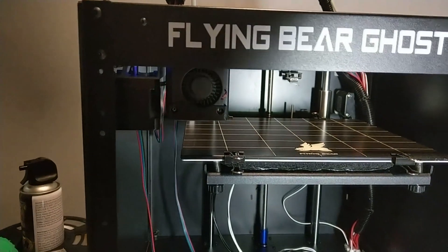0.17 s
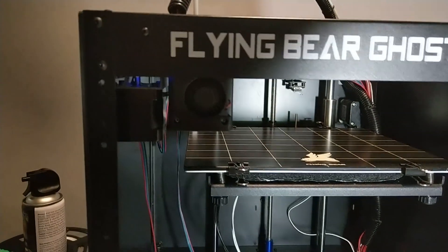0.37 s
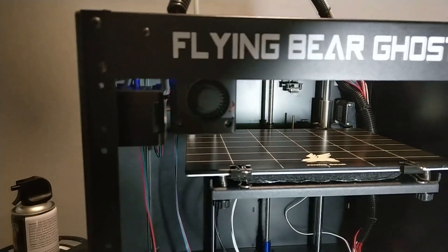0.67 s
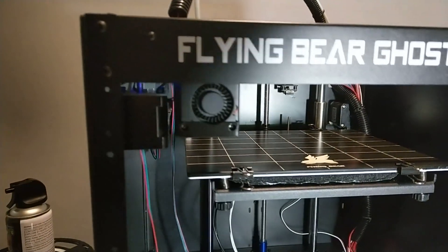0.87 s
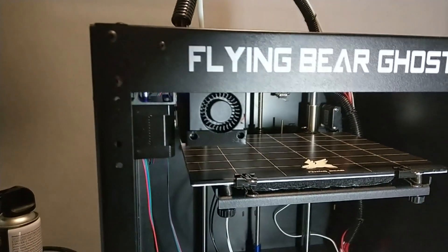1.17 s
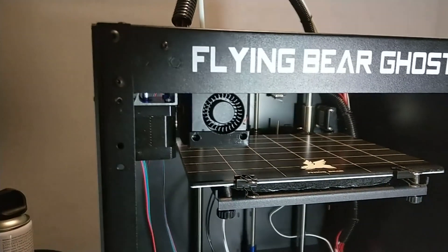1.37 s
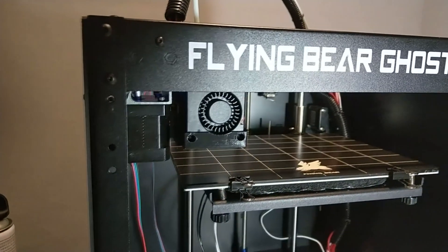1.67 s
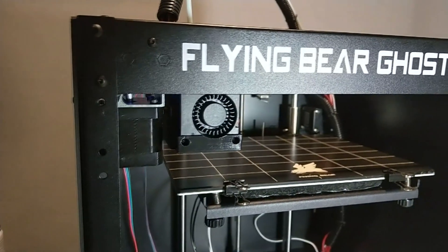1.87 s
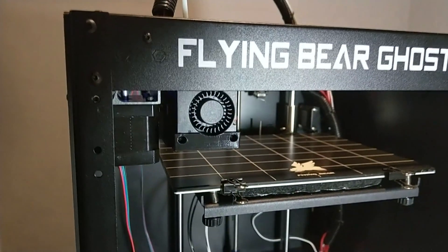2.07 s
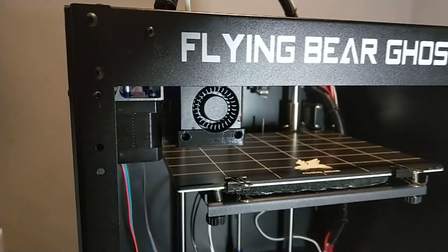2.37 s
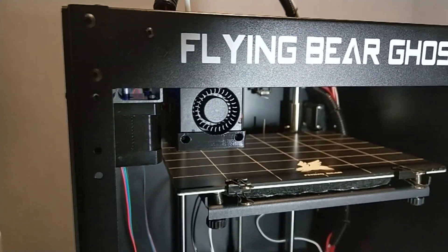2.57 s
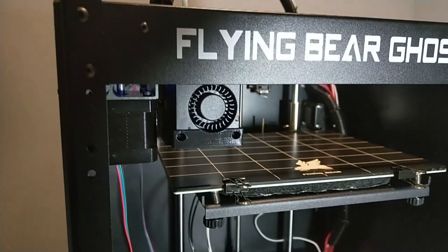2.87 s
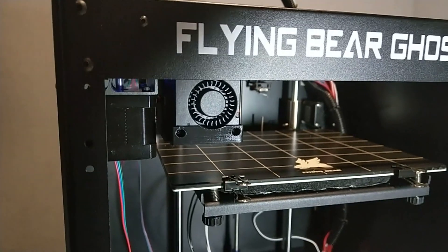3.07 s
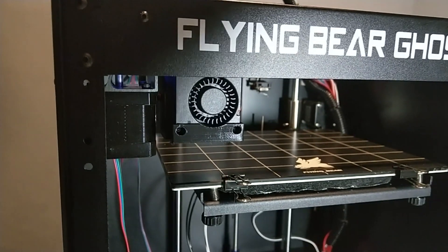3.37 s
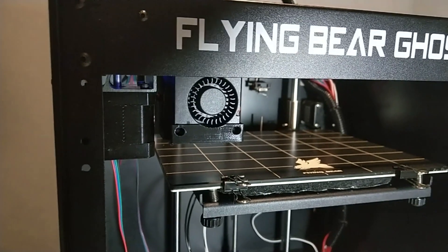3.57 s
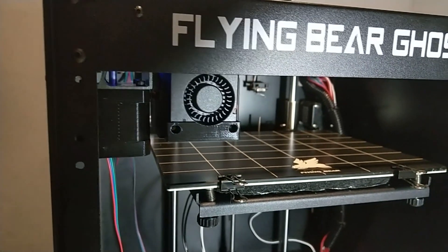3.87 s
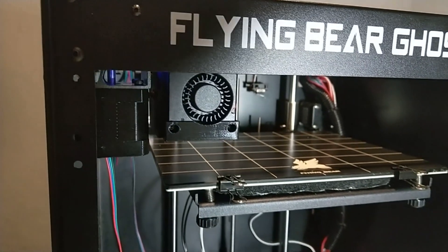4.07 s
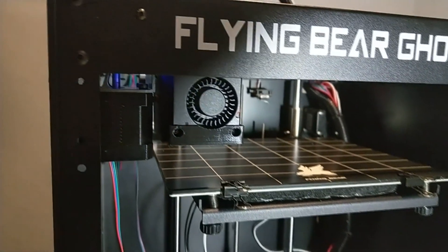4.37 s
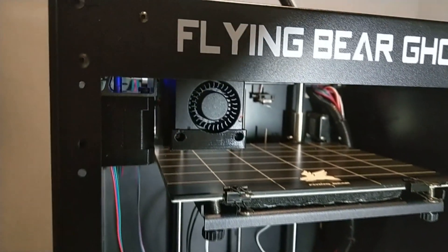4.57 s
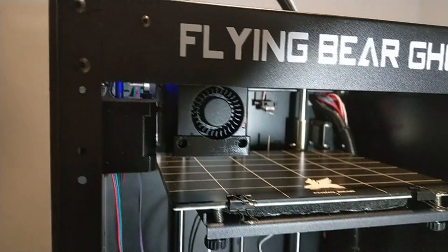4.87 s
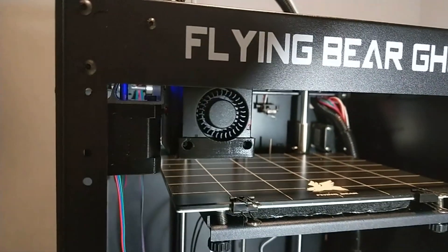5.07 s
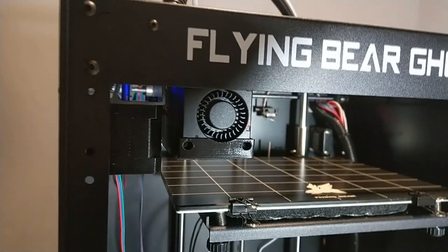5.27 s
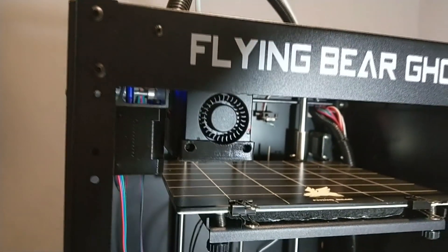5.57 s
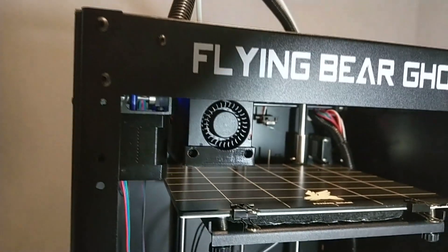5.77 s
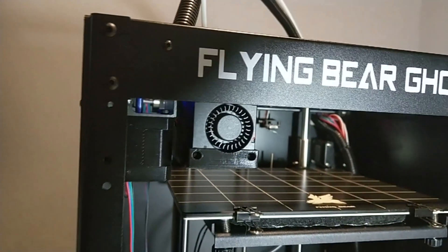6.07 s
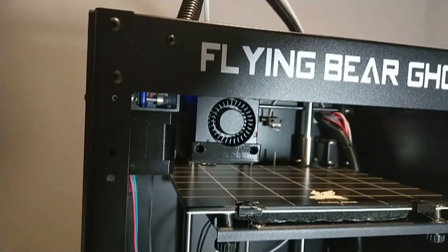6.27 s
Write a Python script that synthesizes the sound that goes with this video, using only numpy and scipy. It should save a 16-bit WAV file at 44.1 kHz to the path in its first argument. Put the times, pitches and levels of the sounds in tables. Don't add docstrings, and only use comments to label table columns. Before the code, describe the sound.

A small cooling fan with a dry, worn bearing runs close by in a quiet workshop, brighter toward the right. From 0 to about 0.4 seconds a piercing metallic whine, strongest around 7 kHz, flutters widely about 25 times a second over a low buzz near 157 Hz. It then calms to a steadier, slightly trembling whine, easing a little around 0.7. At about 1.1 its timbre shifts with a brief rough slip, and from 1.4 its pitch sags slightly. Around 2.4 the whine abruptly disappears; the rotor speeds up into a dense, bright, hissing rattle with ringing housing and wavering low tones. It is roughest near 3.5, then from 3.7 settles into a steady rattling whir with cleaner low hum until 6.3. Faint room hush, mains hum and handling rumble persist, with dull bumps near 0.2, 2.3, 3.1, 3.7 and 4.2.

```python
import sys
import numpy as np
from scipy import signal
from scipy.fft import rfft, irfft, next_fast_len
from scipy.io import wavfile
from scipy.ndimage import uniform_filter1d

SR = 44100
rng = np.random.default_rng(int(sys.argv[2]) if len(sys.argv) > 2 else 0)


def voltage_ratio(level):
    return 10 ** (np.asarray(level, float) / 20)


def master_out(mix):
    frames = np.transpose(np.atleast_2d(mix))
    ceiling = np.clip(frames, -1, 1)
    pcm = np.round(ceiling * 32767).astype(np.int16)
    wavfile.write(sys.argv[1], SR, pcm)


N = 282681
SIZE = next_fast_len(N)
TIME = np.arange(N) / SR
HZ = np.fft.rfftfreq(SIZE, 1 / SR)

CALM_S, SHIFT_S, UNLOCK_S, SETTLE_S = .435, 1.09, 2.39, 3.66
LOCKED_TURNS = 159.1

# (frequency [Hz], width [Hz], level [dB])
HOUSING_MODES = [(2318, 20, -13.5), (2850, 20, -17), (3214, 150, -15), (3553, 133, -17), (3970, 170, -16),
                 (4513, 184, -14), (5259, 55, -2.5), (5420, 32, -8), (5760, 220, -8), (5900, 28, -8.5),
                 (6310, 130, -5), (6924, 330, -2.5), (7230, 60, -3), (7430, 79, -2), (7536, 44, -1.5),
                 (7820, 114, -0.5), (8350, 300, -8.5), (8780, 110, -8.5), (9830, 110, -12)]
# (time [s], bearing level [dB], unbalance hum level [dB], frame ring level [dB])
LOOSE_LEVELS = [
    (2.42, -44, -78, -62),
    (2.7, -42.5, -69.5, -56),
    (2.95, -42, -69.5, -55.5),
    (3.07, -43.5, -68.5, -57),
    (3.16, -42.5, -64.5, -56.5),
    (3.54, -41, -67, -51.5),
    (3.72, -43, -65, -61),
    (4.3, -42, -62.5, -56.5),
    (6.3, -43, -62, -57),
]


def level(x, db):
    return x * voltage_ratio(db) / np.sqrt(np.mean(x ** 2))


def curves(table):
    s, *columns = np.transpose(table)
    return [np.interp(TIME, s, c) for c in columns]


def across(table, hz, index=1):
    table = np.array(table)
    return np.interp(np.log(hz + 1), np.log(table[:, 0]), table[:, index])


def modes(table, hz):
    power = sum(voltage_ratio(db) ** 2 / (1 + (2 * (hz - f) / width) ** 2) for f, width, db in table)
    return np.sqrt(power)


def colour(x, gain):
    return irfft(rfft(x, SIZE) * gain, SIZE)[..., :N]


def noise_pair():
    return rng.standard_normal((2, N))


def walk(rate):
    return level(colour(rng.standard_normal(N), 1 / (1 + (HZ / rate) ** 2)), 0)


def after(s, blend_s):
    return np.clip((TIME - s) / blend_s + .5, 0, 1)


def since(s):
    return np.maximum(TIME - s, 0)


def shaft():
    tire_s = 1.4
    tired = np.minimum(since(tire_s), UNLOCK_S - tire_s)
    locked = LOCKED_TURNS - 2.8 * np.exp(-TIME / .6) - .65 * tired ** 2
    free = 12.95 * (1 - np.exp(-since(UNLOCK_S) / .33))
    settled = 4.8 * (1 - np.exp(-since(SETTLE_S) / .7))
    return locked + free + settled


def wobble():
    wide_hz, calm_hz = 25, 29.4
    wide_swing, calm_swing, shifted_swing, tired_swing = .069, .019, .028, .016
    calm = after(CALM_S, .08)
    hz = wide_hz + calm * (calm_hz - wide_hz + 1.5 * walk(4))
    hz = hz - 11 * since(1.7)
    small = calm_swing + (shifted_swing - calm_swing) * after(SHIFT_S, .1)
    small = small + (tired_swing - shifted_swing) * after(1.95, .15)
    swing = wide_swing + calm * (small * voltage_ratio(2.0 * walk(4)) - wide_swing)
    return swing * np.cos(2 * np.pi * (-.75 + np.cumsum(hz) / SR))


def knock_lines():
    # (multiple of turn rate, level while the wobble is wide [dB],
    # level once calm [dB], level after the contact shifts [dB])
    favoured = [(2, -31, -39, -40), (3, -23, -20, -21), (5, -33, -26, -25), (12, -23, -29, -27),
                (13, -15, -15, -18), (15, -22, -21, -30), (20, -23, -19, -24), (24, -27, -22, -28),
                (27, -19, -18, -22), (31, -15, -12.5, -17.5), (32, -24, -23, -21), (33, -20, -10, -15),
                (35, -21, -16, -16), (36, -23, -24, -16), (37, -16, -20, -8.5), (41, -15, -12, -11),
                (42, -15, -19, -12), (43, -14, -15, -3), (44, -4, -6, -13), (45, 5, 4.5, 0),
                (46, -13, -9, -10), (47, -9, -9, .5), (48, -13, -15, -24), (49, -2, 1.5, -2),
                (50, -7, -8.5, -12), (51, -14, -17, -10), (52, -17, -14, -20), (55, -21, -18, -14),
                (57, -24, -22, -32), (61, -21, -24, -27)]
    # (frequency [Hz], level [dB])
    plain_levels = [(600, -34), (1400, -31.5), (2700, -33), (3400, -25), (4700, -26.5), (5300, -23),
                    (6700, -12.5), (9600, -25.5), (10700, -40.5)]
    k = np.arange(2, 79)
    plain = across(plain_levels, k * LOCKED_TURNS)
    plain = plain - 4 * (k % 2 == 0)
    scatter_db = 1.5 * rng.standard_normal((len(k), 3))
    rows = np.column_stack([k, plain[:, None] + scatter_db])
    favoured_rows = np.round(favoured)[:, 0].astype(int) - 2
    rows[favoured_rows, 1:] = np.array(favoured)[:, 1:]
    return rows


def knocks(angle, turn_hz):
    loudest_line = 45
    count = int((UNLOCK_S + 0.018) * SR)
    sway = wobble() + .004 * walk(40)
    swung_angle = (angle + sway)[:count]
    swung_hz = (turn_hz + np.gradient(sway) * SR / (2 * np.pi))[:count]
    drag_db = -0.15 * np.clip(swung_hz - turn_hz[:count], -1, 1)
    grid_hz = np.arange(0, 14000, 5)
    notch = 1.08 - modes([(7195, 150, 0)], grid_hz) ** 2
    body = (.1 + modes(HOUSING_MODES, grid_hz)) ** .6 * notch
    calm = after(CALM_S, .03)[:count]
    creep, jump = after(SHIFT_S - .03, 0.68)[:count], after(SHIFT_S, 0.14)[:count]
    sag_db = -7 * after(.62 + 0.064, .2)[:count] * (1 - jump)
    drift_db = 1.0 * walk(1.5) + 1.1 * walk(35)
    out, chance = np.zeros((2, N)), rng.uniform(0, 1, (90, 3))
    for k, wide_db, early_db, late_db in knock_lines():
        slide = np.interp(k * swung_hz, grid_hz, body)
        slide = slide / np.sqrt(uniform_filter1d(slide ** 2, size=4000))
        shifted = jump if 44 < k < 49 else creep
        db = wide_db + (early_db - wide_db) * calm + (late_db - early_db) * shifted
        if k == loudest_line:
            db = db + sag_db
        phase_chance, _, drift_chance = chance[int(k)]
        own = int(drift_chance * (N - count))
        strength = voltage_ratio(db + min(k / 30, 1) * (drift_db[own:own + count] + drag_db)) * slide
        phase = 2 * np.pi * (phase_chance + np.array([[0], [.25]]))
        out[:, :count] += strength * np.sin(k * swung_angle + phase)
    power = uniform_filter1d(out[0] ** 2, size=12000)
    return out / np.sqrt(power + 1e-6 + (TIME > UNLOCK_S + .03))


def rattle(angle):
    # (frequency [Hz], level [dB])
    floor = [(600, -32.5), (1100, -29.5), (2200, -14.5), (2900, -65), (4900, -21), (7400, -20), (9000, -38),
             (10800, -28.5), (11200, -43), (14200, -41), (15000, -114)]
    # (frequency [Hz], width [Hz], depth [dB])
    dips = [(2440, 80, 3), (2910, 53, 1), (3920, 90, -4), (6230, 150, -3.5)]
    bunch = sum(0.037 * np.cos(k * angle / 3 + k * k) for k in (1, 2, 4, 5, 6))
    tilt = voltage_ratio(across([(1500, -29), (2200, 3.5), (9000, 1.5), (11000, -15.5)], HZ))
    ring = modes(HOUSING_MODES, HZ) ** 1.103 * tilt
    gain = np.hypot(voltage_ratio(across(floor, HZ)), ring)
    gain = gain * np.clip(1 - modes(dips, HZ) ** 2, .1, 1)
    out = 0
    for low_hz, high_hz in ((0, 4900), (4900, 6300), (6300, 7300), (7300, 8200), (8200, SR)):
        swell = voltage_ratio(1.0 * walk(900) + 0.9 * walk(0.73))
        grit = noise_pair() * swell * (1 + bunch)
        out = out + colour(grit, gain * (HZ >= low_hz) * (HZ < high_hz))
    return level(out, 0)


def workshop():
    # (frequency [Hz], level [dB])
    hush = [(20, -3.5), (60, -27), (130, -17), (220, -18.5), (330, -24), (450, -28), (570, -13.5),
            (720, -20.5), (1200, -16), (2500, -10.5), (5000, -30.5)]
    # (frequency [Hz], level [dB])
    mains = [(59.5, -79), (118.5, -79)]
    # (time [s], level [dB], spread [s])
    grip_shifts = [(.15, -63, 0.099), (.52, -65, 0.07), (.82, -72, 0.083), (1.14, -53.5, 0.077),
                   (1.68, -65.5, 0.22), (2.5, -65, 0.092), (2.97, -60.5, 0.12), (3.5, -59.5, 0.11),
                   (3.75, -62, .04), (3.95, -64, 0.059), (4.23, -54, .07), (4.62, -64, 0.1),
                   (4.94, -72, .04), (5.18, -63, 0.038), (5.55, -70, 0.19), (6.28, -69, 0.12)]
    # (time [s], level [dB], ring time [s])
    bumps = [
        (0.237, -59, 0.52),
        (2.299, -58, 0.54),
        (3.057, -55, 0.49),
        (3.684, -51.5, 1),
        (4.238, -55, 0.4),
    ]
    out = level(colour(noise_pair(), voltage_ratio(across(hush, HZ))), -61.5) * voltage_ratio(1.0 * walk(4.5))
    out = out + sum(np.sqrt(2) * voltage_ratio(db) * np.sin(2 * np.pi * hz * TIME) for hz, db in mains)
    rumble = colour(noise_pair(), modes([(116, 72, -1.0), (238, 530, -9.5)], HZ) ** 2)
    grip = voltage_ratio(-73)
    for s, db, spread_s in grip_shifts:
        grip = grip + voltage_ratio(db) * np.exp(-((TIME - s) / spread_s) ** 2 / 2)
    out = out + level(rumble, -6.5) * grip * voltage_ratio(2.0 * walk(19))
    for s, db, ring_s in bumps:
        age = since(s)
        swell = (1 - np.exp(-age / 0.014)) * 1000 ** (-age / ring_s)
        out = out + voltage_ratio(db) * swell * np.sin(2 * np.pi * 19 * age)
    return out


def orbit(angle):
    # (multiple of orbit rate, level [dB])
    orbit_tones = [(7, -72), (8, -72), (9, -72), (12, -75.5), (13, -78), (15, -68.5), (18, -71),
                   (33, -58.5), (36, -69.5), (40, -76), (45, -68.5)]
    # (frequency [Hz], waver [Hz], level [dB])
    hunting_tones = [(413, 5.55, -71), (450, 4.53, -71), (491, 6.93, -75.5), (1030, 14.6, -73.5)]
    settled = after(SETTLE_S, .12)
    panels = colour(noise_pair(), modes([(666, 340, -0.64), (1033, 47, -1.6)], HZ) ** 2)
    out = level(panels, -72) * after(UNLOCK_S, .04) * voltage_ratio(-3 * after(5.1, 1.5))
    for k, db in orbit_tones:
        firm = settled * voltage_ratio(-.15 * k * (1 - after(4.84, 0.97)))
        if k == 15:
            firm = after(UNLOCK_S, 0.045) * voltage_ratio(-7 * np.exp(-since(UNLOCK_S) / .5))
        if k == 9:
            firm = settled * voltage_ratio(-9 * after(4.27, 0.58))
        blur = 0.018 * k * walk(7.1) + rng.uniform(0, 2 * np.pi, (2, 1))
        loudness = np.sqrt(2) * voltage_ratio(db + 0.51 * walk(4.0)) * firm
        out = out + loudness * np.sin(k * angle / 3 + blur)
    hunting = after(UNLOCK_S + 0.018, .12) * (1 - settled)
    for hz, waver_hz, db in hunting_tones:
        phase = 2 * np.pi * np.cumsum(hz + waver_hz * walk(11.2)) / SR
        ring = np.sin(phase + np.array([[0], [2]]))
        out = out + level(ring, db) * voltage_ratio(3.1 * walk(22)) * hunting
    beat = 1 + 0.12 * np.cos(np.where(TIME < SETTLE_S, 2 * np.pi * 44 * TIME, angle / 3))
    frame = colour(noise_pair() * beat, modes([(1952, 180, 0)], HZ) ** 3.17)
    return out + level(frame, -0.78) * voltage_ratio(curves(LOOSE_LEVELS)[2]) * after(UNLOCK_S, 0.033)


def fan():
    # (time [s], bearing level [dB], unbalance hum level [dB])
    locked_levels = [
        (0, -39, -56.5),
        (.3, -38.5, -60),
        (.57, -39, -61.5),
        (.65, -40.5, -62.5),
        (.95, -41, -64),
        (1.15, -40, -66.5),
        (1.9, -39.5, -65.5),
        (2.38, -40.5, -64),
    ]
    turn_hz = shaft()
    angle = 2 * np.pi * np.cumsum(turn_hz) / SR
    loose = after(UNLOCK_S, 0.037)
    locked_db, hum_db = curves(locked_levels)
    loose_db, loose_hum_db, _ = curves(LOOSE_LEVELS)
    wide_db, calm_db, slip_db, slip_s = -11, -15, 4.5, .07
    slip = np.exp(-((TIME - SHIFT_S - slip_s) / slip_s) ** 2)
    share = voltage_ratio(wide_db + (calm_db - wide_db) * after(CALM_S, .05) + slip_db * slip)
    noise = rattle(angle)
    whine = np.sqrt(1 - share ** 2) * knocks(angle, turn_hz)
    locked = voltage_ratio(locked_db + 0.44) * (whine + share * noise)
    hum = np.sqrt(2) * voltage_ratio(hum_db + (loose_hum_db - hum_db) * loose) * np.sin(angle)
    return (1 - loose) * locked + loose * voltage_ratio(loose_db) * noise + orbit(angle) + voltage_ratio(-2.5) * hum


def ports(near, other):
    # (frequency [Hz], level [dB], likeness [0-1])
    port_balance = [(60, 2, 0.42), (197, -1.5, 0.55), (690, -3, 1), (1550, -2.5, 0.15), (1950, -15.5, 0.87),
                    (2960, -1.5, 0.95), (4820, -3, 0.03), (5400, -9, 0.05), (8100, -14, 0.06),
                    (8100, -21, 0.3), (9540, 9.5, 1), (11300, 1.5, 0.74)]
    shade = voltage_ratio(across(port_balance, HZ))
    like = np.clip(across(port_balance, HZ, index=2), 0, 1)
    lead = np.exp(2j * np.pi * HZ * 4 / SR * (HZ < 9000))
    scale = 2 / np.sqrt(1 + shade ** 2 + shade * like)
    left = colour(near, scale * shade * like * lead)
    left = left + colour(other, scale * shade * np.sqrt(1 - like ** 2))
    return np.array([left, colour(near, scale)])


def scene():
    near, other = fan() + workshop()
    return ports(near, other)


def band_limit(x):
    return signal.sosfilt(signal.butter(12, 15500, fs=SR, output="sos"), x)


def record(dry):
    octave = colour(dry ** 2, modes([(13600, 1600, 0.0058)], HZ) ** 2)
    heard = colour(dry + 1.3 * octave, HZ < 15120)
    return band_limit(heard)


dry = scene()
out = record(dry)
master_out(out)
```